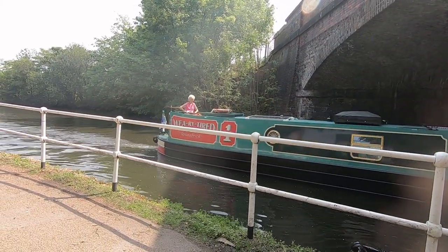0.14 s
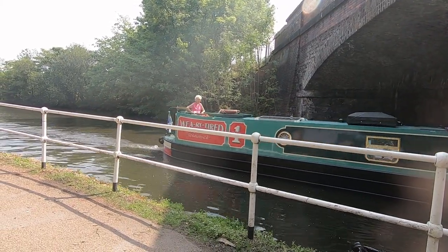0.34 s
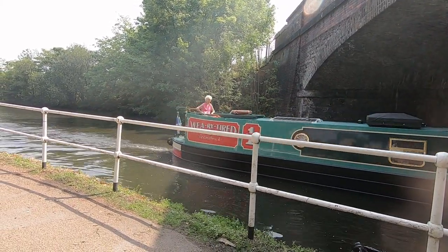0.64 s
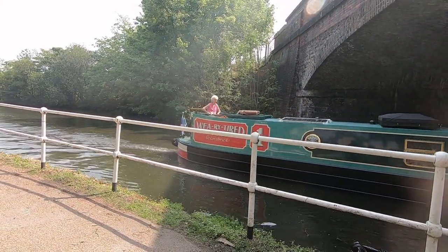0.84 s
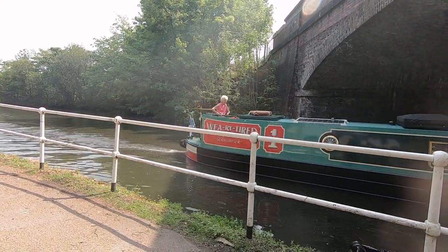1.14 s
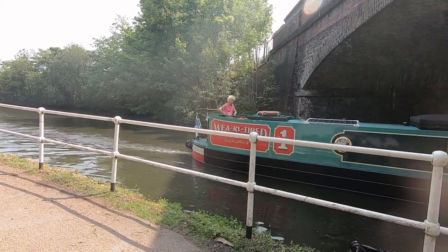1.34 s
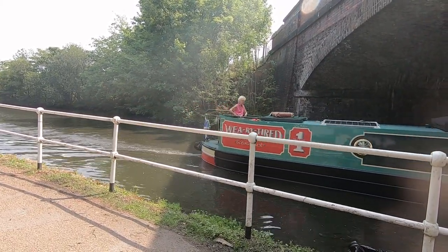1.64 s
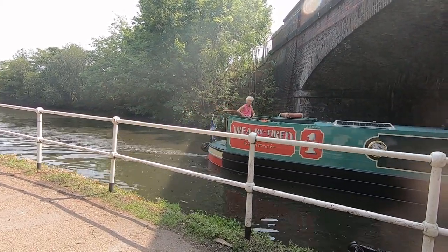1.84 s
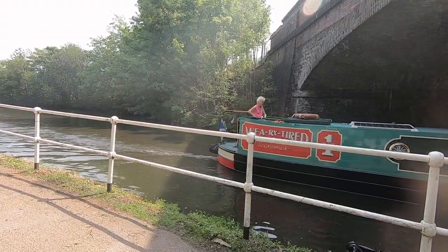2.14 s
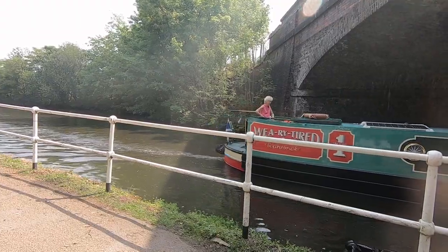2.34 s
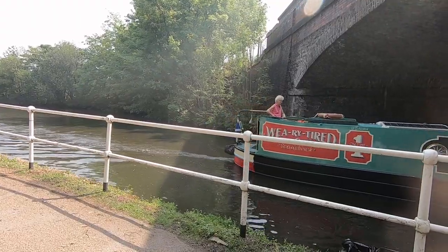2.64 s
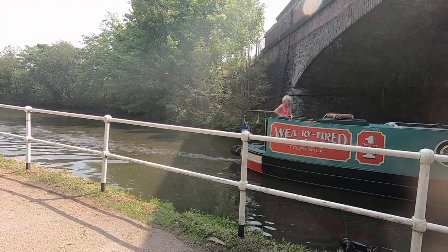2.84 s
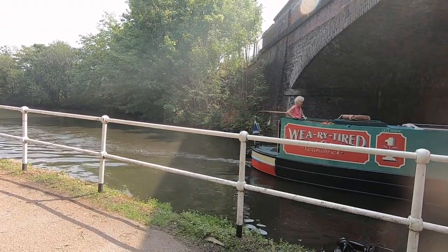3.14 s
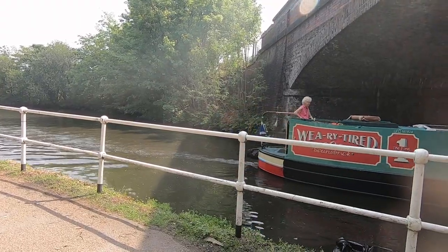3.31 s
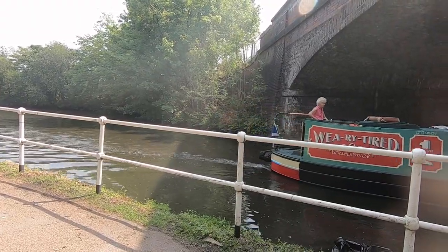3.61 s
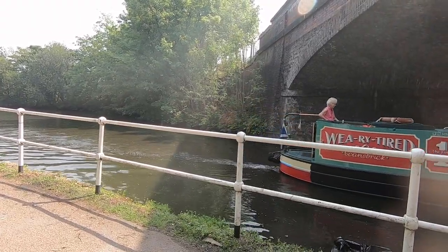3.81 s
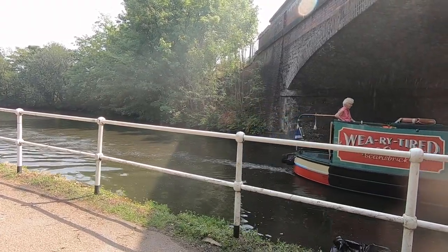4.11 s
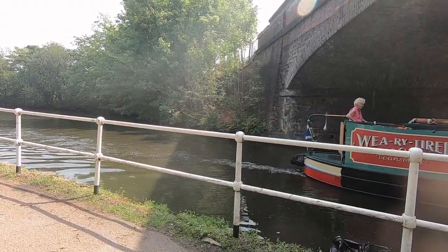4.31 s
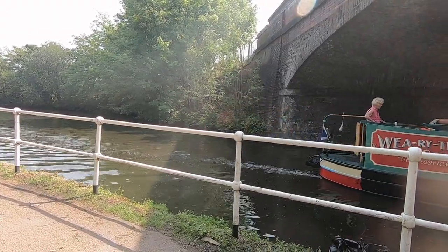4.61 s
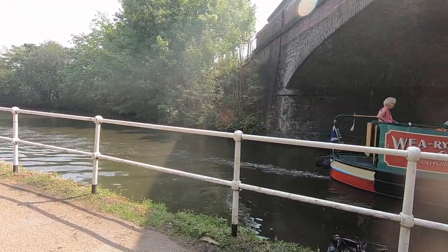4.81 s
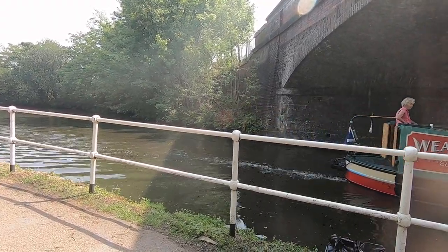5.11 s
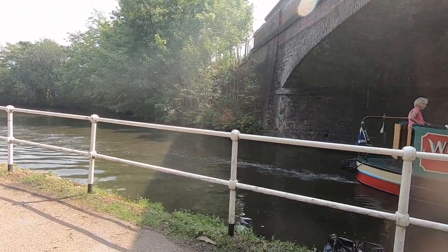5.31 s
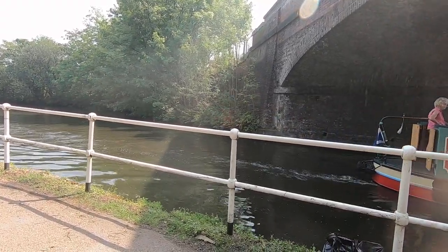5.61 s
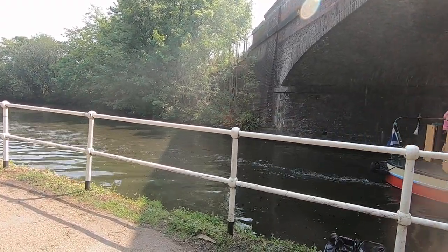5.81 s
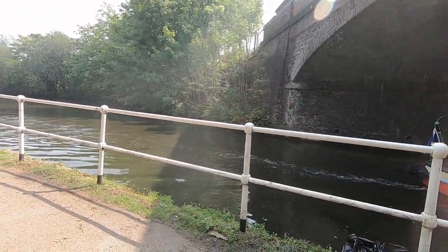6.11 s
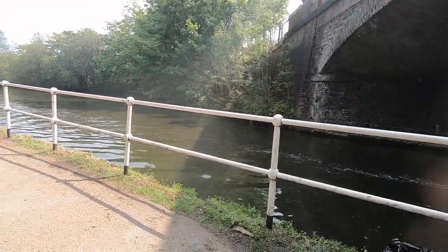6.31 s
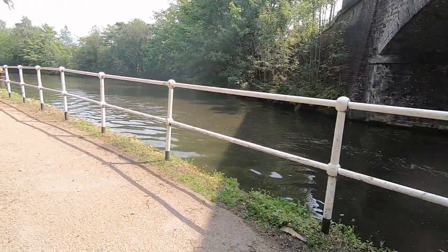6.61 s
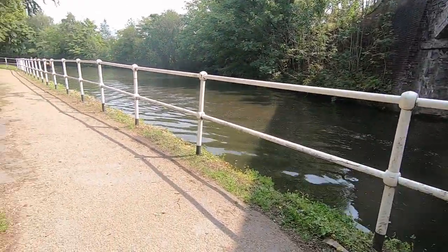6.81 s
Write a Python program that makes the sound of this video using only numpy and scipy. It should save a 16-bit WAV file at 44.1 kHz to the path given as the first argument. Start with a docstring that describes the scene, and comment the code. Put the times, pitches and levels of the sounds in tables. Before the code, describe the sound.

A diesel canal boat chugs steadily past with a low throbbing hum, its wake fizzing, dripping and glugging.

```python
"""On a canal towpath by a brick bridge, a four-cylinder diesel boat passes at steady speed and slides
under the arch. Its exhaust beats, each tone swelling and fading on its own as it meets its echo off
water and brick. The propeller thrums, machinery hums, the hull rumbles and roars, and bubbles make the
wake fizz, drip and glug. Near the end the microphone swings away: the upper exhaust tones fade and a
puff of air thumps its ports."""
import sys
import numpy as np
from scipy import signal
from scipy.fft import rfft, irfft, next_fast_len
from scipy.io import wavfile
from scipy.ndimage import uniform_filter1d, map_coordinates

SR = 44100
rng = np.random.default_rng(int(sys.argv[2]) if len(sys.argv) > 2 else 0)


def generate_wav(signal):
    """Clip the signal to [-1, 1] and save it as 16-bit WAV at the path in sys.argv[1]."""
    frames = np.transpose(np.atleast_2d(signal))
    scaled = np.clip(frames, -1, 1) * 32767
    pcm = np.round(scaled).astype(np.int16)
    wavfile.write(sys.argv[1], SR, pcm)


N = 306627
TIME = np.arange(N) / SR
ENTER_S, UNDER_S = 1.5, 5.3  # the boat nears the arch, and is under it
UNDER_ARCH = np.clip((TIME - ENTER_S) / (UNDER_S - ENTER_S), 0, 1)


def amp(db):
    return 10 ** (np.asarray(db) / 20)


def unit(x):
    return x / np.sqrt(np.mean(x ** 2) + 1e-20)


def along(points, hz):
    """Read a curve of (freq_hz, value) points on a log frequency axis."""
    freqs, values = np.transpose(points)
    return np.interp(np.log(hz + 1), np.log(freqs + 1), values)


def curves(rows):
    """One automation curve for each column after the time."""
    time_s, *columns = np.transpose(rows)
    return [np.interp(TIME, time_s, column) for column in columns]


def wobble(rate):
    """A random drift that glides through rate points a second."""
    return map_coordinates(rng.standard_normal(int(N * rate / SR) + 4), [TIME * rate], order=1)


def filtered(x, response):
    """EQ x with a complex gain given as a function of frequency."""
    size = next_fast_len(N + 8192)
    return irfft(rfft(x, size) * response(np.fft.rfftfreq(size, 1 / SR)), size)[..., :N]


def tone(db, phase):
    """A sine of the given rms level."""
    return np.sqrt(2) * amp(db) * np.cos(phase)


def rush(spectrum, patchy_db, grains=0):
    """Two noise beds near rms 1, in patches of random gain, with grains mixed in before the EQ."""
    bins = signal.stft(rng.standard_normal((2, N)), nperseg=512)[2]
    patches = uniform_filter1d(uniform_filter1d(rng.standard_normal(bins.shape[1:]), 6, 0), 8, 1)
    noise = signal.istft(bins * amp(patchy_db * unit(patches)), nperseg=512)[1][:, :N]
    pair = filtered(unit(noise) + grains, lambda hz: amp(along(spectrum, hz)))
    return pair / np.sqrt(np.mean(pair[0] ** 2))


def bubbles(start_s, hz, peak, cycles):
    """Damped sines whose pitch rises as the bubbles near the surface."""
    t = np.arange(int(np.max(2.5 * cycles / hz) * SR)) / SR
    age = t * hz[:, None] / cycles[:, None]
    envelope = peak[:, None] * np.e * 3 * age * np.exp(-3 * age)
    ring = envelope * np.sin(2 * np.pi * hz[:, None] * t * (1 + 0.027 * age))
    at = np.round(start_s * SR).astype(int)[:, None] + np.arange(t.size)
    return np.bincount(at.ravel(), ring.ravel(), N + SR)[:N]


def fizz(per_s, low_hz, high_hz, cycles, spread_db, db):
    """Two channels of random bubbles that come in clumps."""
    when, pitch, size, length = rng.random((int(per_s * N / SR), 4)).T
    clumps = np.cumsum(amp(5 * wobble(12)))
    start_s = np.interp(when, clumps / clumps[-1], TIME)
    hz = low_hz * (high_hz / low_hz) ** pitch
    peak = amp(spread_db * np.minimum(-np.log(1 - size), 3.5))
    pair = [bubbles(start_s, hz, peak * side, cycles * (.5 + length)) for side in (1, np.sign(length - .5))]
    return amp(db) * unit(np.array(pair))


# Engine speed: time_s, firing_hz
ENGINE_SPEED = [(0, 49.92), (1, 49.77), (2, 49.78), (3.2, 49.68), (4.8, 49.84), (5.6, 49.81), (6.95, 49.71)]
# The second harmonic swells, dips at the mouth of the arch and returns: time_s, level_db, path_shorter_m
SECOND_HARMONIC = [(0, -42, .2), (.8, -37, 0), (1.5, -33, 0), (2.4, -32, .25), (3.4, -28.5, .5),
                   (4.3, -30, .2), (5, -37, .2), (5.9, -28.5, 0), (6.5, -27, -.2)]
# Strong exhaust tones, with level (before the echo) and echo share set at MIDDLE_S:
# firing_multiple, level_db, growth_db_per_s, echo_share, share_change_per_s, fade_every_s, fade_at_s
EXHAUST_TONES = [(1, -24.3, .27, .25, 0, 5.43, 5.23), (1.25, -47.5, 0, .55, 0, 6.2, .5),
                 (2.25, -44.2, -.7, .48, .09, 3.96, 1.64), (2.5, -53, 0, .6, -.1, 4.4, 2.1),
                 (2.75, -54, 0, .7, 0, 4.5, 2), (3, -36.4, 1.4, .38, -.07, 4.15, 2.2),
                 (3.25, -47.3, .5, .22, 0, 4.6, 2.8), (3.5, -47, 2.3, .4, .09, 4, 2.48),
                 (3.75, -47.1, 0, .26, .08, 3.1, 3.92), (4, -47, .2, .8, .03, 4.3, 1.3),
                 (5, -48.5, 2.8, .35, -.04, 3.1, 2.1), (7.25, -56.2, .4, .61, 0, 5.8, .64),
                 (8.25, -59, 4, .04, .2, 4.25, 6.96)]
# Unlike cylinders fill in overtones of the four-firing cycle: cycle_multiple, open_db, under_arch_db
CYLINDER_TONES = [(2, -54, -57), (3, -60, -56), (6, -58, -55), (7, -49, -53), (17, -59, -53),
                  (18, -56, -57), (19, -62, -59), (21, -60, -57), (23, -63, -57), (24, -59, -50),
                  (25, -60, -63), (27, -65, -59), (31, -59, -57), (32, -61, -57), (36, -60, -62),
                  (37, -57, -63), (41, -66, -57), (42, -66, -59), (43, -63, -62)]
MIDDLE_S, SOUND_M_PER_S = 3.5, 343
TURN_S, TURN_DB_PER_S = 6.4, -24  # the microphone turns away


def exhaust():
    """Each firing sends out a suction pulse; echoes off water and brick shift as the boat moves."""
    firing_hz, = curves(ENGINE_SPEED)
    firing = 2 * np.pi * np.cumsum(firing_hz) / SR + 0.015 * wobble(11)
    rad_per_m = 2 * np.pi * firing_hz / SOUND_M_PER_S
    # upper tones come by way of the arch, on a path that grows ever faster
    arch_lag = rad_per_m * .057 * np.maximum(TIME - 1, 0) ** 2
    away_db = TURN_DB_PER_S * np.maximum(TIME - TURN_S, 0)
    second_db, shorter_m = curves(SECOND_HARMONIC)
    beat = -tone(second_db + .4 * wobble(13), 2 * (firing + rad_per_m * shorter_m))
    since_s = TIME - MIDDLE_S
    for k, db, growth, share, change, fade_every_s, fade_at_s in EXHAUST_TONES:
        echo_phase = 2 * np.pi * (TIME - fade_at_s) / fade_every_s
        echo = np.clip(share + change * since_s, 0, 1) * np.exp(1j * echo_phase)
        level_db = db + growth * since_s + 0.12 * k * wobble(12) + np.clip((k - 1) / 2, 0, 1) * away_db
        # tones between the harmonics wander in phase
        wander = (k % 1 > 0) * (rng.uniform(0, 2 * np.pi) + 0.35 * wobble(1.5))
        beat -= np.abs(1 - echo) * tone(level_db, k * (firing - (k > 2.5) * arch_lag) + wander)
    for k, open_db, arch_db in CYLINDER_TONES:
        level_db = open_db + (arch_db - open_db) * UNDER_ARCH + 1.6 * wobble(2.0) + (k > 9) * away_db
        wander = rng.uniform(0, 2 * np.pi) + 0.41 * wobble(1.69)
        beat += tone(level_db, k * (firing - (k > 10) * arch_lag) / 4 + wander)
    return beat


# Blade harmonics around the main thrum: blade_multiple, level_vs_thrum_db
BLADE_TONES = [(1, -13), (3, -19.5), (4, -15), (5, -15)]
# A tone just below the thrum that makes it throb: time_s, level_db
THROB_TONE = [(.6, -44), (1.8, -51), (4.4, -50), (5.7, -42.5)]
THRUM_HZ, THRUM_DB = 79.35, -41.5  # the second blade harmonic
THROB_EVERY_S, THROB_DIP_S = 1.29, 3.15


def propeller():
    """Blades thump past the rudder in a low, slowly throbbing thrum."""
    blade = np.pi * THRUM_HZ * TIME
    throb_db, = curves(THROB_TONE)
    slip = 2 * np.pi * (TIME - THROB_DIP_S) / THROB_EVERY_S
    thrum = tone(THRUM_DB, 2 * blade) - tone(throb_db, 2 * blade - slip)
    for k, relative_db in BLADE_TONES:
        thrum += tone(THRUM_DB + relative_db + 3 * wobble(2.5), k * blade + wobble(1.9))
    return thrum


# Steady machinery hums and a faint high whine: pitch_hz, level_db
HUM_TONES = [(26.2, -61), (56.1, -48.5), (281.8, -52.5), (1799.6, -73)]


def machinery_hum():
    """Belt-driven machinery hums and faintly whines, wavering a little in level and pitch."""
    return sum(tone(db + 4 * wobble(1.48 + hz / 80), 2 * np.pi * hz * TIME + 0.89 * wobble(1.3 + hz / 40))
               for hz, db in HUM_TONES)


# EQ curves for the hull's low rumble and midrange roar: freq_hz, relative_db
RUMBLE_EQ = [(18, -12.5), (32, -3), (45, 5.5), (70, 4), (100, 0), (135, 1), (200, -1.5), (270, -8),
             (320, -8.5), (430, -12.5), (700, -58)]
ROAR_EQ = [(180, -14.5), (300, -2), (327, -8), (402, -7.5), (436, -8), (523, -7.5), (674, -13.5),
           (1130, -12), (1510, -19), (2000, -24), (2600, -50), (4400, -120)]
# EQ curves for the wake's bright wash and airy spray: freq_hz, relative_db
WASH_EQ = [(880, -29), (1500, -4.5), (1880, -3), (2420, 0.5), (3090, -0.5), (5300, -12.5), (7280, -42.5),
           (12300, -120)]
SPRAY_EQ = [(2940, -24.5), (5100, -6.5), (6200, -1.5), (7230, -0.5), (8530, -2), (9090, -3), (10700, -16.5),
            (13900, -43.5), (22000, -120)]
# Fader moves as the water surges: time_s, wash_db, roar_db, spray_db
WATER_LEVELS = [(0, -56, -46, -68), (.5, -53, -42.5, -64.5), (.9, -55.5, -45, -67.5), (1.8, -55, -46, -65),
                (2.6, -58, -46, -67), (3.4, -56.5, -46, -66), (3.85, -53.5, -43, -63),
                (4.25, -54, -44.5, -62.5), (4.6, -53.5, -43.5, -60.5), (4.95, -55, -44, -63),
                (5.3, -52.5, -41, -59.5), (5.6, -53, -42.5, -60.5), (6.3, -54.5, -42, -61),
                (6.7, -55, -42, -60), (6.82, -55, -41.5, -58)]


def hull_and_wake():
    """Hull plates rumble and roar; churned water hisses, full of bursting bubbles."""
    wash_db, roar_db, spray_db = curves(WATER_LEVELS)
    # the rumble rides the wash and builds under the arch
    rumble_db = -43 + 0.5 * (wash_db - wash_db.mean()) + 4 * UNDER_ARCH + 0.91 * wobble(2.79)
    churn_db = 0.4 * wobble(9.3) + 0.84 * wobble(70)
    rumble = amp(rumble_db) * rush(RUMBLE_EQ, patchy_db=2.5)
    gurgle = fizz(150, 594, 1537, cycles=10.2, spread_db=0, db=-18.5)
    roar = amp(roar_db + 0.37 * churn_db) * rush(ROAR_EQ, patchy_db=0.5, grains=gurgle)
    froth = fizz(500, 1896, 5520, cycles=8.6, spread_db=2.5, db=-11)
    wash = amp(wash_db + 1.06 * churn_db) * rush(WASH_EQ, patchy_db=1, grains=froth)
    flutter_db = 1.3 * churn_db + 0.68 * wobble(14)
    sizzle = fizz(500, 5000, 15000, cycles=8.8, spread_db=2, db=-9.5)
    spray = amp(spray_db + flutter_db) * rush(SPRAY_EQ, patchy_db=0.39, grains=sizzle)
    return rumble + roar + wash + spray


def clusters(impacts, cycles, pitch_spread, gain_db, count):
    """Each impact frees count bubbles around one pitch within a few milliseconds, on two channels."""
    impact_s, db, hz = np.repeat(impacts, count, axis=0).T
    detune, size, delay, polarity = rng.standard_normal((len(hz), 4)).T
    pitch_hz = np.minimum(hz * np.exp(pitch_spread * detune), 14000)
    rolloff_db = 60 * np.maximum(pitch_hz / 9500 - 1, 0)
    peak = amp(db + gain_db - 2.1 * np.abs(detune) + size - rolloff_db)
    start_s = impact_s + 0.0016 * np.abs(delay)
    ring_cycles = np.full(len(hz), cycles)
    return np.array([bubbles(start_s, pitch_hz, peak * side, ring_cycles) for side in (1, np.sign(polarity))])


# The loudest drops in the wake, before each layer's gain: start_s, level_db, pitch_hz
WAKE_DROPS = [(.115, -53, 4570), (.166, -51, 2340), (.19, -51.5, 4630), (0.215, -48, 3450),
              (0.34, -43, 4620), (.411, -48, 2400), (.416, -53, 4600), (.491, -48, 2630), (.553, -51, 4000),
              (0.567, -43.5, 2560), (0.591, -47, 5800), (0.614, -43.5, 3650), (0.65, -51, 2490),
              (.706, -49.5, 3860), (.808, -52, 2500), (.742, -48, 2410), (.917, -46.5, 2450),
              (1.212, -47, 6430), (1.212, -43, 2700), (1.471, -48, 3180), (1.627, -46.5, 3620),
              (1.748, -47.5, 2700), (1.774, -46, 7500), (1.81, -51, 4570), (1.834, -51, 7560),
              (1.887, -49, 2120), (1.908, -45.5, 8820), (2.451, -52, 2030), (2.652, -49.5, 4130),
              (2.93, -60, 2550), (3.256, -47, 2980), (3.601, -47, 5940), (3.701, -50, 3050),
              (3.702, -46, 7100), (3.735, -49, 3420), (3.749, -47, 2020), (3.776, -45, 7500),
              (3.805, -51, 7350), (3.828, -50.5, 2400), (3.834, -50, 6150), (3.89, -47, 3680),
              (3.919, -45, 2280), (3.931, -48, 7260), (3.979, -46, 5900), (4.007, -47.5, 7240),
              (4.086, -50.5, 3520), (4.104, -47.5, 2100), (4.13, -49, 3600), (4.148, -52, 2660),
              (4.181, -45, 7100), (4.22, -44, 3100), (4.24, -50, 3230), (4.271, -46, 3700),
              (4.29, -46, 3380), (4.477, -49, 2120), (4.501, -53, 3210), (4.584, -47, 2390),
              (4.627, -47, 7320), (4.659, -49, 7520), (4.768, -48, 2560), (5.081, -48.5, 2230),
              (5.086, -43, 7700), (5.117, -44, 4100), (5.168, -48, 4630), (5.2, -49, 2380),
              (5.303, -44.5, 4550), (5.303, -39.5, 7860), (5.32, -50, 3120), (5.34, -48, 2900),
              (5.385, -52, 2560), (5.458, -49, 8000), (5.591, -41, 8200), (5.792, -46, 8100),
              (5.815, -50.5, 2600), (6.199, -46, 8500), (6.711, -45, 2100), (6.783, -50, 7500)]
SPIT_HZ = 5500  # drops from this pitch up burst as spray


def drops():
    """Large drops plink and tick as they hit the water; the smallest spit."""
    large = [row for row in WAKE_DROPS if row[2] < SPIT_HZ]
    small = [row for row in WAKE_DROPS if row[2] >= SPIT_HZ]
    plinks = clusters(large, cycles=12, pitch_spread=.05, gain_db=-3, count=3)
    ticks = clusters(large, cycles=6.3, pitch_spread=.18, gain_db=-5.5, count=10)
    spits = clusters(small, cycles=22, pitch_spread=.15, gain_db=-13, count=12)
    return plinks + ticks + spits


# Big, slow bubbles: start_s, peak_db, pitch_hz, ring_cycles
BIG_BUBBLES = [(.548, -38, 1013, 24), (1.262, -44, 1010, 23), (1.86, -38, 318, 18.4),
               (3.486, -44, 1135, 25), (3.83, -41.5, 1003, 20), (3.916, -42, 868, 26),
               (4.02, -43.5, 1210, 22), (4.89, -40, 777, 17), (4.9, -40.5, 276.5, 22),
               (5.121, -38, 1070, 25), (5.274, -46.5, 780, 17), (5.425, -40.5, 1124, 56),
               (5.77, -39, 245.5, 31), (5.845, -41, 930, 20), (6.756, -45, 920, 17)]


def glugs():
    """Big bubbles ring one by one, lower and longer than the drops."""
    start_s, peak_db, hz, cycles = np.transpose(BIG_BUBBLES)
    return bubbles(start_s, hz, amp(peak_db), cycles)


def air_puff():
    """A puff of air thumps the ports as the microphone swings, harder on the right."""
    thump = bubbles(start_s=np.array([6.69]), hz=np.array([28.2]), peak=amp([-27]), cycles=np.array([2.7]))
    return thump * [[-.5], [1]]


# How alike left and right are in the diffuse sound: freq_hz, correlation
STEREO_LIKENESS = [(150, 1), (240, 0.98), (390, 0.99), (620, 0.78), (990, 0.46), (1580, 0.11), (2520, 0.74),
                   (3800, 0.96), (5160, .55), (6800, 1), (10200, 1)]
# How strongly each band leans to the right: freq_hz, lean_weight
STEREO_LEAN = [(50, 0.02), (120, 0.02), (330, 0.087), (600, .95), (1100, 1.5), (1900, 0.2), (3300, .95),
               (6000, .15), (10000, .25)]
# Phase between the ports: freq_hz, left_lead_rad
STEREO_PHASE = [(0, -0.37), (690, 0.2558), (950, 0.93), (1290, 0), (1640, 2.5), (2150, -0.25), (2500, 0.54),
                (4130, 0.56), (5340, -1.5), (6290, -0.43), (10400, 0.5)]


def microphone_ports(direct, diffuse):
    """Two close ports: alike in the bass, apart near their resonance, louder on the boat's side."""
    sign = np.array([[1], [-1]])  # left, right
    width = lambda hz: np.arccos(np.clip(along(STEREO_LIKENESS, hz), -1, 1)) / 2
    mid, side = filtered(diffuse, lambda hz: np.array([np.cos(width(hz)), np.sin(width(hz))]))
    pair = direct + mid + sign * side
    phase_shift = lambda hz: np.exp(.5j * sign * along(STEREO_PHASE, hz))
    centred = filtered(pair, phase_shift)
    leaning = filtered(pair, lambda hz: phase_shift(hz) * amp(-4 * sign * along(STEREO_LEAN, hz)))
    pan = np.maximum((1 + 0.5 * TIME) / 8, .15)  # drifts right as the boat draws off
    return (1 - pan) * centred + pan * leaning


def scene():
    """The machinery plays direct, with hull and water spread around it."""
    water = hull_and_wake()
    machinery = exhaust() + propeller() + machinery_hum()
    return microphone_ports(direct=machinery, diffuse=water + drops() + glugs())


def record(dry):
    """The left port is a little less sensitive; the puff joins the mix and the very top is cut."""
    left_vs_right_db, top_hz = -0.8, 15050
    balance = amp([[left_vs_right_db / 2], [-left_vs_right_db / 2]])
    return filtered(dry * balance + air_puff(), lambda hz: hz < top_hz)


dry = scene()
out = record(dry)
generate_wav(out)
```